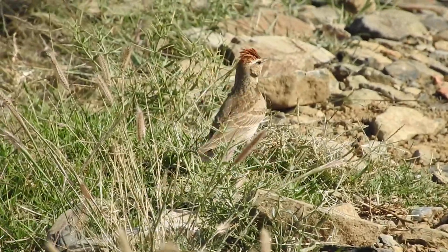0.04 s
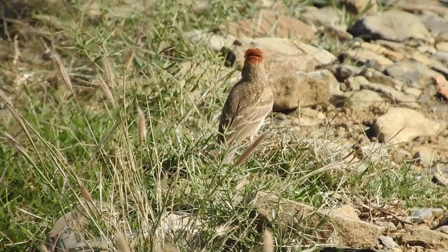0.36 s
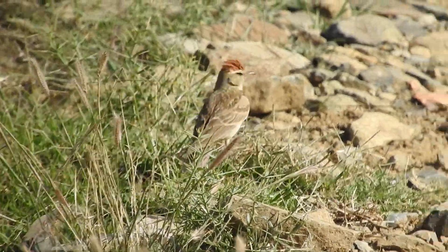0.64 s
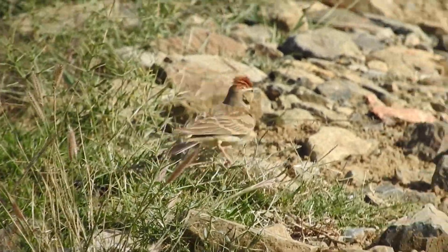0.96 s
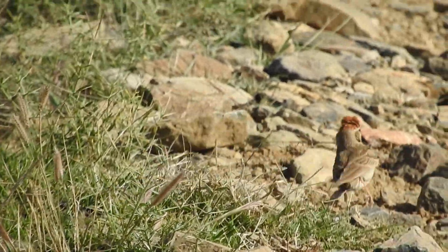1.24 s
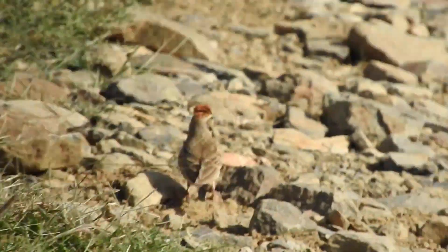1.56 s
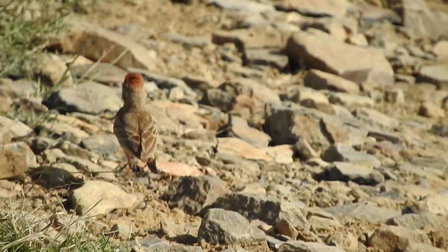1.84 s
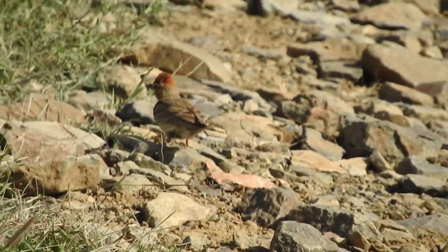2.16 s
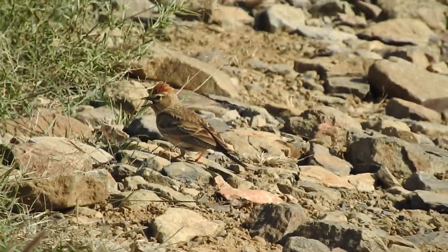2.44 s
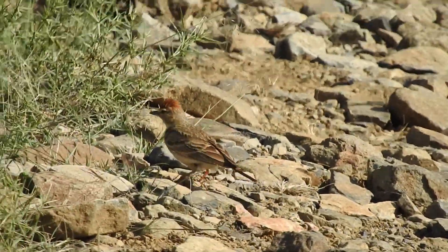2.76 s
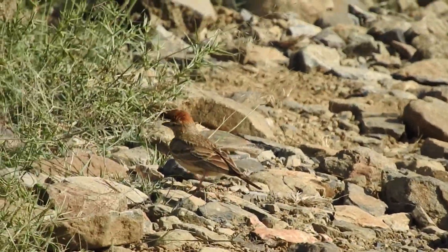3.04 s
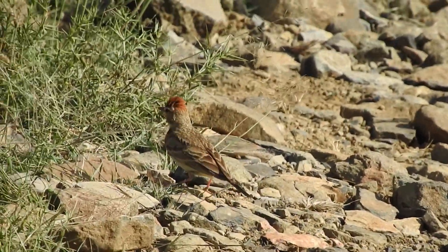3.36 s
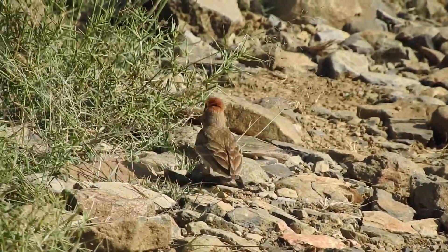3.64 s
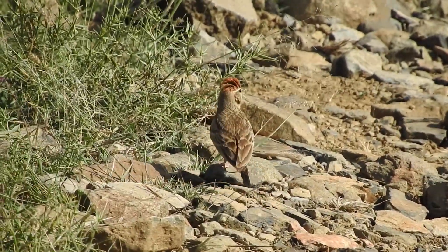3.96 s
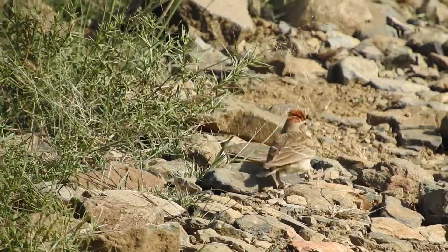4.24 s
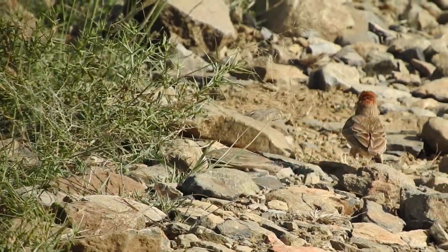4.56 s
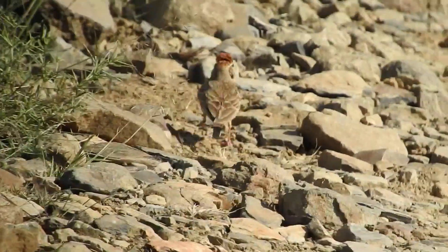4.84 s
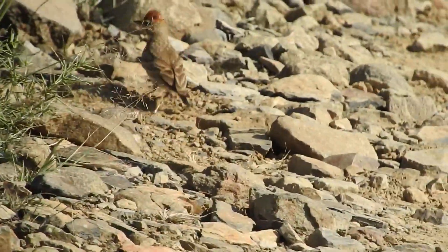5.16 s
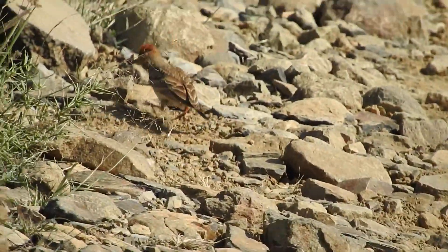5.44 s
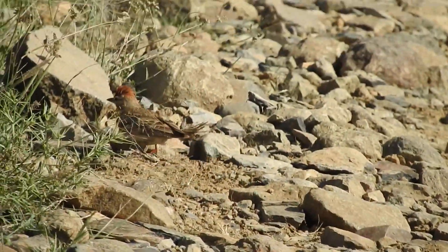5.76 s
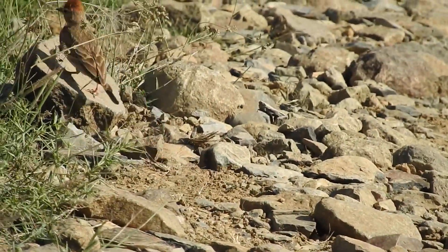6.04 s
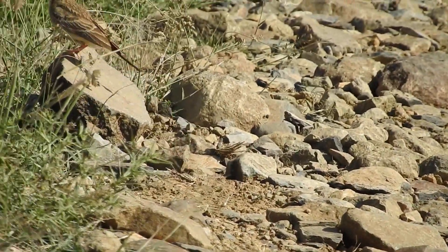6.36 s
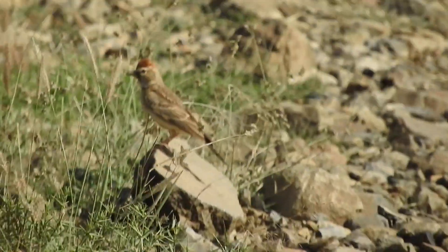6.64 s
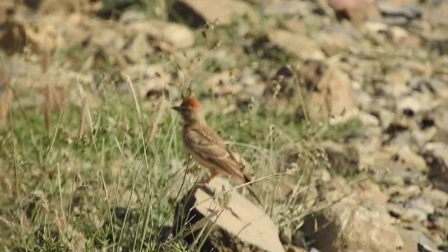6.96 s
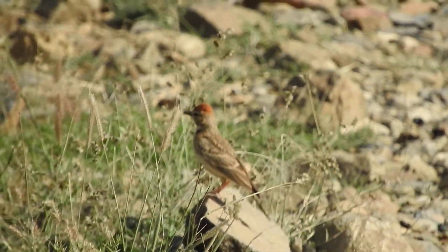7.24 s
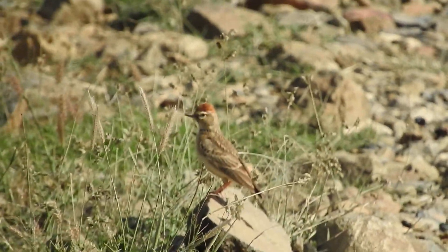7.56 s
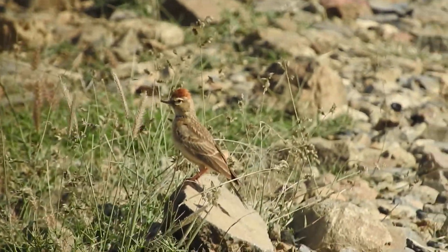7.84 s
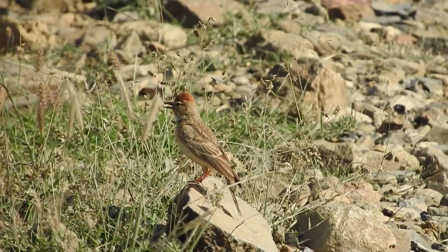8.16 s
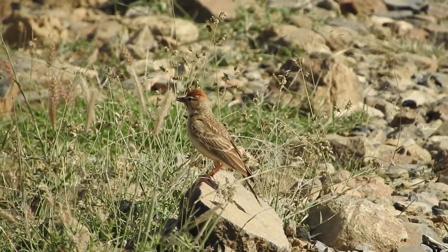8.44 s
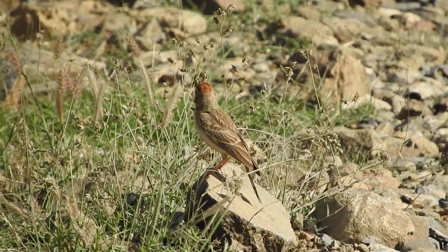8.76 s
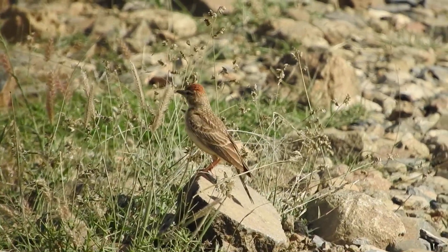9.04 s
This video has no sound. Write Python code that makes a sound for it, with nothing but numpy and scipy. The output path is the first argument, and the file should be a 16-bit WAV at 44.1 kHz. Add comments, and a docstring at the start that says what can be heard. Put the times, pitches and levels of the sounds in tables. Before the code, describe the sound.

Wind buffets the microphone from the start with a low, fluttering rumble, irregular thumps and a fine ticking, heaviest in the first second, with hard knocks at about 1.3 and 2.1 seconds. A lark sings through it on open, stony ground. Three high slurred whistles come at 0.5 seconds, a very soft warble around 1.5, and three quieter slurs at 2.5. From 4.3 to 5.1 seconds it gives two whistles, a short ticking trill and two closing notes, as the gusts pick up again. Two brighter chirrups follow between 6.6 and 7 seconds. The wind dies down after about 7.5 seconds, leaving a clear last phrase from 8 to 9 seconds: two whistles, a ticking trill and two rising notes. Distant birds twitter faintly now and then over a soft, steady rush of air.

```python
"""Lark in gusty wind

A lark sings short phrases of slurred whistles, ticking trills and chirrups, and a second, farther bird twice
sings a soft warble; stony ground scatters each note back. Gusts buffet both ports of the camera's microphone
with low thumps, then die down; the biggest duck the gain, and a fine, even ticking rides on the buffeting. Far
birds twitter over a soft rush of air."""
import sys
import numpy as np
from scipy import signal
from scipy.fft import rfft, irfft, next_fast_len
from scipy.io import wavfile
from scipy.ndimage import uniform_filter1d, map_coordinates

SR = 44100
rng = np.random.default_rng(int(sys.argv[2]) if len(sys.argv) > 2 else 0)


def store_wav(level_fs):
    """Save 16-bit WAV to argv[1]."""
    pcm = np.round(np.clip(np.atleast_2d(level_fs), -1, 1) * 32767)
    wavfile.write(sys.argv[1], SR, pcm.T.astype(np.int16))


N = 409688

# Noise spectra. Each row: frequency in Hz, relative density in dB.
AIR_SPECTRUM = [(30, -5), (60, -3.5), (150, -19), (400, -29), (650, -5.5), (790, -6), (870, 1.5), (950, -5),
                (1060, -5), (1250, -10), (1750, -13), (2200, -27.5), (3500, -28), (8000, -65)]
HISS_SPECTRUM = [(500, -22.5), (2000, -8), (3400, -3.5), (5000, -3), (7000, -6), (10000, -10),
                 (12000, -14.5), (15500, -22.5)]
RUMBLE_SPECTRUM = [(20, -56.5), (45, -25.5), (70, -10.5), (88, -18.5), (120, -5.5), (180, -0.5), (250, -7),
                   (340, -13.5), (500, -26.5), (1000, -56), (2000, -88.5)]
FLUTTER_SPECTRUM = [(150, -41), (250, -7.5), (340, -1.5), (500, -3.5), (700, -11), (1000, -19),
                    (1500, -30.5), (2200, -35.5), (4000, -76.5)]
# Scatter from the stones. Each row: frequency in Hz, base T60 in seconds.
STONE_DECAY = [(2500, 0.025), (5000, 0.14), (12000, 0.0077)]
# Nearest rocks. Each row: echo delay in seconds, gain in dB.
ROCK_ECHOES = [(.009, -22), (.017, -25), (.028, -27)]
# Far birds. Each row: start and end in seconds, notes per second, pitch in Hz, relative level in dB.
TWITTER_RUNS = [(0.031, .6, 16, 3350, -56.5), (3.749, 3.95, 18, 3400, -50.5),
                (3.958, 4.148, 23, 3300, -57.5), (5.805, 6.58, 15, 3350, -56),
                (7.753, 8.35, 21.2, 3220, -53)]
# Faint steady tones. Each row: start and length in seconds, pitch in Hz, level in dB.
DISTANT_TONES = [(1.48, 0.2, 793, -44), (2.329, 0.2, 780, -47)]
# Wind strength. Each row: time in seconds, relative rumble and flutter levels in dB.
GUSTS = [(0.0, -12, -24.0), (0.97, -9, -20.5), (1.17, -23, -40.5), (1.35, -13.0, -21), (1.43, -24, -36.5),
         (1.91, -26.5, -44), (2.01, -19.5, -29), (2.27, -17, -37.5), (2.32, -27, -51), (2.45, -30.5, -45.5),
         (2.68, -17, -28.0), (2.83, -28.5, -44), (2.96, -26, -38.5), (3.29, -27, -48), (3.58, -18.5, -26),
         (4.0, -30, -46.5), (4.8, -23.5, -40), (4.84, -19.0, -27), (5.69, -18, -34.5), (5.83, -24, -43),
         (6.15, -21.5, -36), (7.29, -24, -41), (7.76, -39.5, -57), (8.02, -28, -46.5), (8.14, -35, -58.5),
         (9.05, -52.5, -55.5), (9.16, -31, -65), (9.28, -47.5, -54)]
# Biggest eddies. Each row: time in seconds, level in dB, pitch in Hz, life in ms, L-R in dB.
BIG_EDDIES = [(0.033, -0.5, 235, 8.1, -4.5), (.191, -0.5, 199, 9.2, 0.5), (.305, -8, 567, 2.5, 1),
              (.39, -19, 605, 1.6, -4.5), (0.442, -11.5, 633, 0.55, -1), (.479, 1, 237, 4.4, 0.5),
              (0.547, 0, 226, 3.9, -4), (0.707, 0, 201, 4, -4), (.81, -5.5, 350, 1.6, 4),
              (.938, -3.5, 199, 4.5, -0.5), (1.01, -11.5, 570, 0.44, 11.5), (1.309, -13, 550, 1, -9),
              (1.34, -2, 234, 2.4, -12), (1.77, -11.5, 234, 3, -8), (1.949, -12.5, 176, 13.5, -4),
              (2.124, 3, 267, 1.9, -2), (2.733, -16, 600, 1.6, 14), (2.964, -9, 390, 2.3, 30),
              (3.096, -23.5, 520, 3, 8), (3.411, -20, 550, 2.6, 10), (3.547, -14, 620, 0.62, 20),
              (3.598, -7, 235.3, 10.7, 7), (4.604, -11, 183, 6.9, -1), (4.708, -12.5, 151, 8.7, -3),
              (4.87, -12, 584, 2, 3), (4.877, -3.5, 220, 2.5, -4), (4.967, -11, 177, 8.7, -5),
              (5.056, -7.5, 225, 3.9, 1), (5.327, -10, 193, 6.6, -2), (5.426, -10.5, 330, 6, -3),
              (5.478, -8, 189, 5.9, -3), (5.682, -8, 231, 1.5, -2), (5.886, -22, 600, 1.5, -23),
              (6.126, -4.5, 295, 1.4, 2), (6.274, -7.5, 246, 4.4, -1), (6.399, -10, 340, 0.84, 13),
              (6.685, -12, 172, 17, 1), (7.273, -15, 202, 6.6, -12)]
# Microphone overloads on two hard thumps. Each row: time in seconds, level in dB.
OVERLOAD_CLICKS = [(1.34, -33.5), (2.125, -27)]
# Syrinx gestures by name. Each row: fraction of the syllable, base pitch in Hz, level in dB.
SYRINX_GESTURES = { "scoop": [(0, 5850, -20), (.25, 5430, -9), (.5, 5100, -4), (.75, 5280, 0),
                   (1, 5190, -8)], "slur": [(0, 5400, -20), (.15, 5680, -7), (.35, 5680, -3),
                   (.73, 5450, -1), (.84, 5100, 0), (1, 3950, -9)], "dip": [(0, 5000, -28), (.2, 4680, -19),
                   (.55, 4550, -14), (.78, 4830, -3), (.92, 4980, 0), (1, 4950, -16)],
                   "whistle": [(0, 5100, -22), (.2, 5160, -10), (.72, 5060, -1), (.88, 4880, 0),
                   (1, 4520, -8)], "rise": [(0, 4500, -21), (.25, 4330, -9), (.5, 4270, -2), (.8, 4490, 0),
                   (1, 4630, -12)], "low": [(0, 4100, -14), (.5, 3810, 0), (1, 3760, -3)],
                   "fall": [(0, 4400, -12), (.3, 4220, 0), (.85, 3740, -2), (1, 3700, -9)],
                   "drop": [(0, 5800, -17), (.3, 4770, -8), (.8, 4050, 0), (1, 3980, 0)],
                   "tick": [(0, 6500, -26), (.2, 4700, -7), (.35, 4080, 0), (.45, 4330, -1), (.6, 5450, -4),
                   (.8, 5880, -2), (1, 6100, -14)], "chirrup": [(0, 3700, -28), (.22, 5800, -11),
                   (.46, 3400, -17), (.57, 3100, -18), (.66, 4100, -4), (.73, 4950, 0), (.84, 6200, -17),
                   (1, 7200, -26)], "pip": [(0, 3400, -16), (.35, 3720, 0), (1, 3620, -14)],
                   "churwee": [(0, 6300, -24), (.06, 4300, -8), (.14, 2650, -16), (.48, 3120, -13),
                   (.6, 4100, 0), (.72, 4950, -1), (.82, 5180, -4), (1, 4880, -15)], }
# Beak response to the octave. Each row: frequency in Hz, gain in dB.
BEAK_RESPONSE = [(5300, 15), (6500, 13), (7800, -2), (10000, 0), (12500, 0), (15000, -14)]
# Motifs by name. Each row: delay in seconds, gesture, length in seconds, pitch ratio, level in dB.
SONG_MOTIFS = { "three slurs": [(0, "scoop", .056, 1, -6), (.096, "slur", .07, .99, 0),
               (.193, "slur", .083, .895, 0)], "lead-in": [(0, "dip", .065, 1, 0),
               (.108, "whistle", .081, 1.005, 0)], "fall and rise": [(0, "fall", .028, 1, 0),
               (.093, "rise", .062, 1, -2)], "two rises": [(0, "drop", .025, 1.17, -19),
               (.018, "rise", .064, 1, 0), (.157, "rise", .059, 1.01, -3.5)],
               "chirrups": [(0, "chirrup", .03, .98, 0), (.026, "pip", .014, .965, -7),
               (.103, "churwee", .048, 1.03, -3)], "soft warble": [(0, "low", .046, 1.33, -8),
               (.119, "low", .058, 1.01, -5), (.233, "low", .055, 1.015, 0), (.326, "drop", .023, 1.3, -7),
               (.423, "drop", .028, 1.15, -2), (.469, "drop", .026, 1.04, 0),
               (.538, "drop", .033, 1.05, 3)], }
# The song; the soft warble rows are a second, farther bird. Each row: start in seconds, motif, level in dB,
# octave before the beak in dB, L-R in dB.
LARK_SONG_MOTIF_SCHEDULE = [ (0.457, "three slurs", -28.5, -27, 10.5),
                            (2.438, "three slurs", -35, -15.5, 4.5), (4.301, "lead-in", -38.5, -23, 5),
                            (4.98, "fall and rise", -35, -25, 0), (6.576, "chirrups", -24, -23, 3.5),
                            (6.823, "chirrups", -23.5, -27, 3), (8.087, "lead-in", -28, -32, 5.5),
                            (8.782, "two rises", -26.5, -38, -1.5), (1.218, "soft warble", -43.5, -26.5, 3),
                            (8.364, "soft warble", -44, -27, -1), ]
# Trills. Each row: tick times in seconds, level in dB, octave before the beak in dB, L-R in dB.
SONG_TRILLS = [([4.554, 4.638, 4.725, 4.806, 4.894], -33, -21.5, 5.8),
               ([8.324, 8.393, 8.473, 8.559, 8.639, 8.732], -26.5, -30, 4.7)]


def amp(db):
    """Decibels to gain."""
    return 10 ** (np.asarray(db) / 20)


def panned(pan_db):
    """Stereo gains for an L-R level difference."""
    return amp([[pan_db / 2], [-pan_db / 2]])


def along(points, hz):
    """Interpolate (Hz, value) points on a log frequency axis."""
    knots_hz, values = np.transpose(points)
    return np.interp(np.log(hz + 1), np.log(knots_hz), values)


def wobble(rate_hz):
    """Smooth random curve."""
    coarse = np.arange(0, N + 32, 32)
    knots = rng.standard_normal(int(N * rate_hz / SR) + 4)
    return np.interp(np.arange(N), coarse, map_coordinates(knots, [coarse * rate_hz / SR]))


def filtered(x, response):
    """Apply a frequency response, given as a function of Hz."""
    size = next_fast_len(N + 8192)
    return irfft(rfft(x, size) * response(np.fft.rfftfreq(size, 1 / SR)), size)[..., :N]


def noise(spectrum, coherence):
    """Coloured stereo noise, rms 1."""
    separate = np.sqrt(1 - coherence) * rng.standard_normal((2, N))
    common = np.sqrt(coherence) * rng.standard_normal(N)
    coloured = filtered(separate + common, lambda hz: amp(along(spectrum, hz)))
    return coloured / np.sqrt(np.mean(coloured ** 2))


def steadied(x, window_samples=3200):
    """Hold the running rms at 1; faster lumps remain."""
    power = uniform_filter1d(np.mean(x ** 2, axis=0), window_samples)
    power = uniform_filter1d(power, window_samples)
    return x / np.sqrt(np.abs(power) + 1e-9)


def add(track, start_s, sound):
    """Mix a sound into a track."""
    part = track[..., max(round(start_s * SR), 0):][..., :sound.shape[-1]]
    part += sound[..., :part.shape[-1]]


def air(rush_db=-54, hiss_db=-58):
    """Soft rush of distant air under an even hiss."""
    rush = amp(rush_db + 0.75 * wobble(2.63)) * noise(AIR_SPECTRUM, coherence=0.88)
    return rush + amp(hiss_db) * noise(HISS_SPECTRUM, coherence=0.042)


def stone_scatter(x, stretch, onset_s=0.0012):
    """Countless small echoes off the stones, a different set per side."""
    hz, t, bins = signal.stft(rng.standard_normal((2, SR // 2)), SR, nperseg=256)
    t60_s = stretch * along(STONE_DECAY, hz)[:, None]
    tail = signal.istft(bins * amp(-60 * t / t60_s), SR)[1]
    tail *= np.clip(np.arange(tail.shape[1]) / SR / onset_s, 0, 1)
    return signal.fftconvolve(x[None], tail / np.linalg.norm(tail[0]), axes=1)[:, :N]


def rock_echoes(x):
    """One delayed copy from each nearby rock."""
    return filtered(x, lambda hz: sum(amp(db) * np.exp(-2j * np.pi * hz * s) for s, db in ROCK_ECHOES))


def far_birds(sweep=0.15, note_s=0.032):
    """Runs of quick falling notes, blurred by distance."""
    notes = np.zeros(N)
    u = np.linspace(0, 1, int(note_s * SR))
    for start_s, end_s, rate_hz, pitch_hz, db in TWITTER_RUNS:
        for s in np.arange(start_s, end_s, 1 / rate_hz):
            hz = pitch_hz * (1 + sweep * (1 - 2 * u) + rng.normal(0, .045))
            envelope = amp(db + 1.5 * rng.standard_normal()) * np.sin(np.pi * u)
            add(notes, s, envelope * np.sin(2 * np.pi * np.cumsum(hz) / SR))
    return .25 * notes + stone_scatter(notes, stretch=1.5)


def far_tones():
    """Two faint, far-off tones of steady pitch."""
    tones = np.zeros(N)
    for s, length_s, hz, db in DISTANT_TONES:
        t = np.arange(int(length_s * SR)) / SR
        add(tones, s, amp(db) * np.sin(np.pi * t / length_s) * np.sin(2 * np.pi * hz * t))
    return tones


def port_highpass(hz, corner_hz=98):
    """The microphone ports shed bass."""
    return hz / np.hypot(hz, corner_hz)


def eddy(hz, life_ms, pan_db, rough_rad=0.74):
    """Brief pressure swing, slightly different at each port; centred 1/32 s in."""
    t = np.arange(-SR // 32, SR // 32) / SR
    swell = 1 / np.cosh(np.clip(1500 * t / life_ms, -50, 50))
    stray = np.array([map_coordinates(k, [(t - t[0]) * 250]) for k in rng.standard_normal((2, 20))])
    sides = panned(pan_db) / panned(pan_db).mean()
    return sides * swell * np.cos(2 * np.pi * hz * t + rough_rad * stray)


def thumps(flutter_db, crest_db=-14.5, slaps_per_s=4, slap_hz=560, slap_over_db=10):
    """Big sharp-crested eddies, two with overload clicks; small random slaps scale with the flutter."""
    track, lead_s = np.zeros((2, N)), 1 / 32
    for s, db, hz, life_ms, pan_db in BIG_EDDIES:
        body = eddy(hz, life_ms, pan_db)
        crest = amp(crest_db) * eddy(hz=650, life_ms=0.8, pan_db=pan_db)
        add(track, s - lead_s, amp(db) * (body + crest))
    for s, db in OVERLOAD_CLICKS:
        add(track, s, amp(db) * np.hanning(32) * rng.standard_normal((2, 32)))
    for when, size, pitch, side in rng.random((100, 4))[:int(slaps_per_s * N / SR)]:
        slap = 2 * size * eddy(slap_hz * (.7 + .6 * pitch), life_ms=1.5, pan_db=24 * (side - .5))
        add(track, when * N / SR - lead_s, amp(flutter_db[int(when * N)] + slap_over_db) * slap)
    return filtered(track, port_highpass)


def wind(rumble_trim_db=1.0, flutter_trim_db=2.5, flow_limit=.55, top_hz=1600):
    """Turbulence on the microphone: slow shared lumps, quicker ones per port, and thumps."""
    times_s, *levels_db = np.transpose(GUSTS)
    rumble_db, flutter_db = (np.interp(np.arange(N) / SR, times_s, db) for db in levels_db)
    lumps = wobble(40)
    port_lumps = lambda rate_hz: 2 * np.tanh(np.array([wobble(rate_hz), wobble(rate_hz)]) / 2)
    rumble = noise(RUMBLE_SPECTRUM, coherence=.11) * amp(6.3 * lumps + 2 * port_lumps(90))
    flutter = noise(FLUTTER_SPECTRUM, coherence=.08)
    flutter *= amp(2.6 * lumps + 4 * np.tanh(wobble(120)) + 5.5 * port_lumps(140))
    churn = amp(rumble_db + rumble_trim_db) * steadied(rumble)
    churn += amp(flutter_db + flutter_trim_db) * steadied(flutter)
    # flow through the narrow ports saturates and loses treble
    flow = flow_limit * np.tanh(churn / flow_limit)
    ported = filtered(flow, lambda hz: port_highpass(hz) / np.sqrt(1 + (hz / top_hz) ** 8))
    return ported + thumps(flutter_db)


def gust_ticking(buffet, rate_hz=93.75, trim_db=-11, knee_hz=900, top_hz=4400):
    """Tiny steps on a fast, even beat; they grow with the buffeting, up to a ceiling."""
    at = (np.arange(.0005, N / SR - .001, 1 / rate_hz) * SR).astype(int)
    buffet_rms = np.abs(uniform_filter1d(np.mean(buffet ** 2, axis=0), size=1000)) ** .5
    size = np.tanh(rng.standard_normal(len(at)) + 1.3 * rng.standard_normal((2, len(at))))
    size *= amp(2 * rng.standard_normal(len(at)))
    impulses = np.zeros((2, N))
    impulses[:, at] = .4 * np.tanh(buffet_rms[at] / .2) * size
    leaky_step = lambda hz: SR / (2 * np.pi) * 1j * hz / (hz ** 2 + knee_hz ** 2)
    return amp(trim_db) * filtered(impulses, lambda hz: leaky_step(hz) / (1 + (hz / top_hz) ** 40))


def syllable(gesture, length_s, ratio, octave_db, waver=0.0014, shimmer_db=3.0,
             rasp_below_hz=4040, rasp_db_per_khz=2):
    """The syrinx sweeps one tone, raspy at low pitch; the beak lets out a weak octave."""
    fraction, pitch_hz, level_db = np.transpose(SYRINX_GESTURES[gesture])
    u = np.linspace(0, 1, int(length_s * SR))
    drift, shimmer, rasp = (map_coordinates(rng.standard_normal(256), [u * length_s * rate_hz])
                            for rate_hz in (300, 250, 1800))
    # muscles round off each turn of pitch
    contour_hz = uniform_filter1d(np.interp(u, fraction, pitch_hz), size=70, mode="nearest")
    hz = contour_hz * ratio * (1 + waver * drift)
    phase = 2 * np.pi * np.cumsum(hz) / SR
    fades = np.clip(np.minimum(u, 1 - u) * length_s / .001, 0, 1)
    rasp_db = rasp_db_per_khz * np.maximum(rasp_below_hz - hz, 0) / 1000
    envelope = amp(np.interp(u, fraction, level_db) + shimmer_db * shimmer + rasp_db * rasp) * fades
    octave = amp(octave_db + along(BEAK_RESPONSE, 2 * hz)) * np.sin(2 * phase)
    return envelope * (np.sin(phase) + octave)


def lark(tick_s=0.016, tick_pitch_spread=.018):
    """Whistled motifs, the soft warble of a second, farther bird, and two trills of V-shaped pitch sweeps,
    mostly left of centre."""
    song = np.zeros((2, N))
    for s, motif, db, octave_db, pan_db in LARK_SONG_MOTIF_SCHEDULE:
        for delay_s, gesture, length_s, ratio, note_db in SONG_MOTIFS[motif]:
            note = syllable(gesture, length_s, ratio, octave_db)
            add(song, s + delay_s, amp(db + note_db) * panned(pan_db) * note)
    for times_s, db, octave_db, pan_db in SONG_TRILLS:
        for s in times_s:
            ratio = 1 + tick_pitch_spread * rng.standard_normal()
            add(song, s, amp(db) * panned(pan_db) * syllable("tick", tick_s, ratio, octave_db))
    return song


def scene():
    """Song, its echoes, far calls, wind on the microphone and air."""
    song, buffet = lark(), wind()
    echoes = rock_echoes(song) + amp(-18) * stone_scatter(song.mean(axis=0), stretch=1.1)
    return song + echoes + far_birds() + far_tones() + buffet + gust_ticking(buffet) + air()


def record(dry, ceiling_db=-2, start_duck_db=5, attack_s=0.00029, recover_db_per_s=8.5, top_hz=15780):
    """Camera gain ducks on the biggest thumps and creeps back; then clipping and a band limit."""
    over_db = np.maximum(20 * np.log10(np.abs(dry).max(axis=0) + 1e-9) - ceiling_db, 0)
    recovery_db = recover_db_per_s * np.arange(N) / SR
    duck_db = np.maximum.accumulate(np.maximum(over_db + recovery_db, start_duck_db)) - recovery_db
    pole = np.exp(-1 / (attack_s * SR))
    gain = amp(-signal.lfilter([1 - pole], [1, -pole], duck_db))
    return filtered(np.clip(dry * gain, -1, 1), lambda hz: hz < top_hz)


dry = scene()
out = record(dry)
store_wav(out)
```